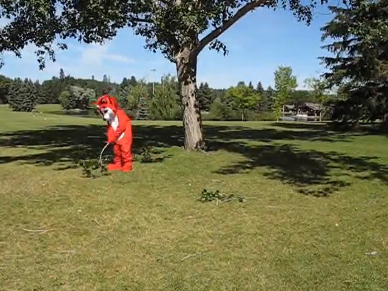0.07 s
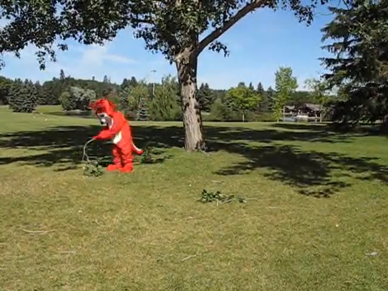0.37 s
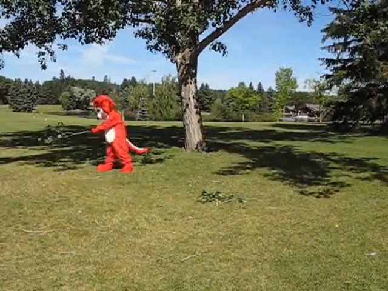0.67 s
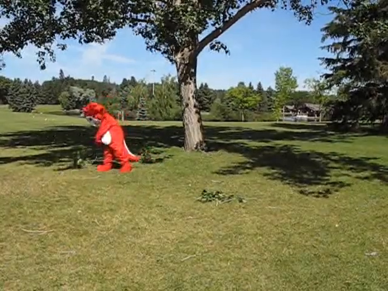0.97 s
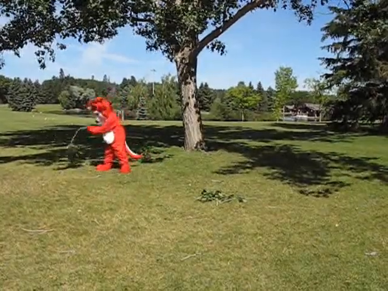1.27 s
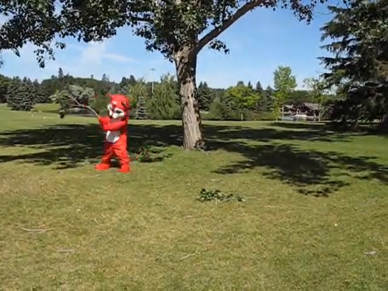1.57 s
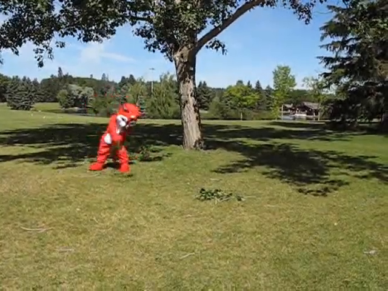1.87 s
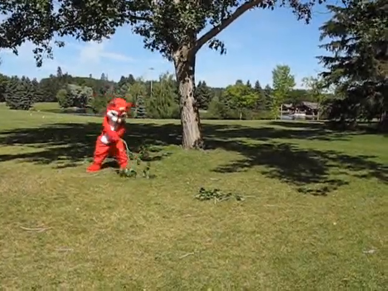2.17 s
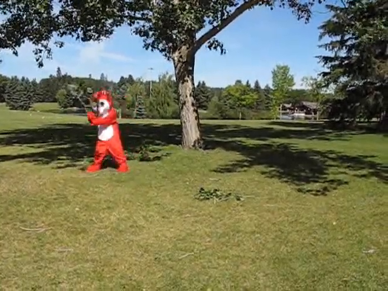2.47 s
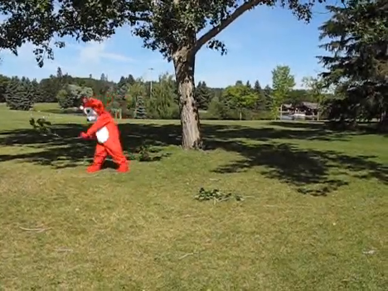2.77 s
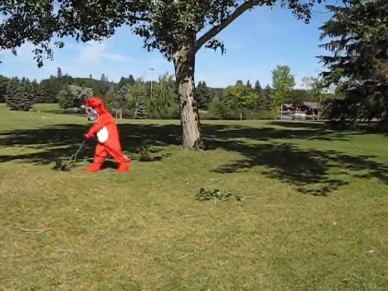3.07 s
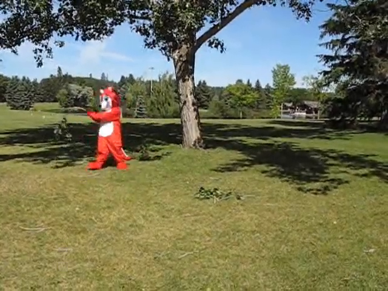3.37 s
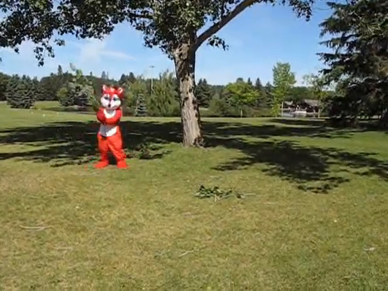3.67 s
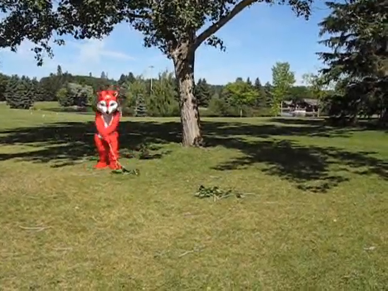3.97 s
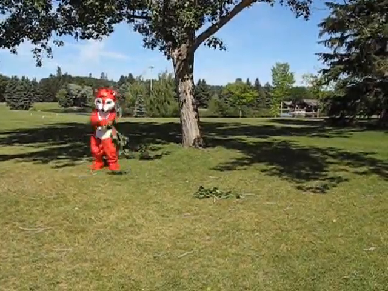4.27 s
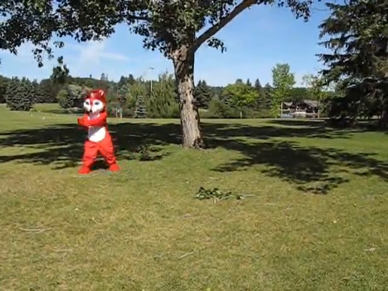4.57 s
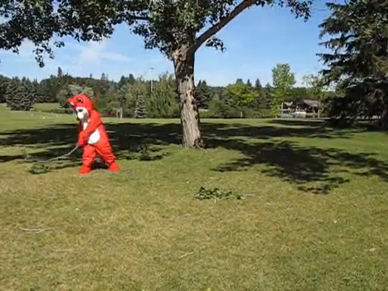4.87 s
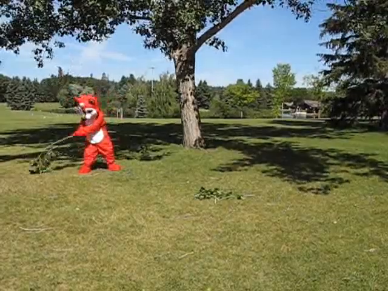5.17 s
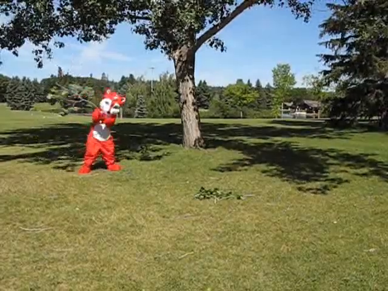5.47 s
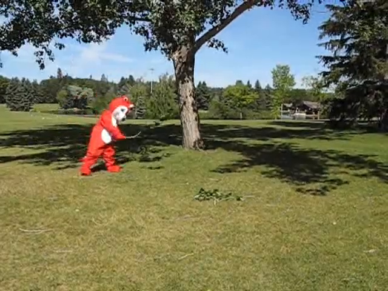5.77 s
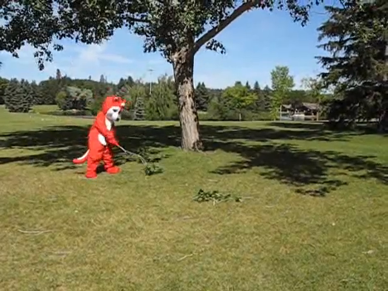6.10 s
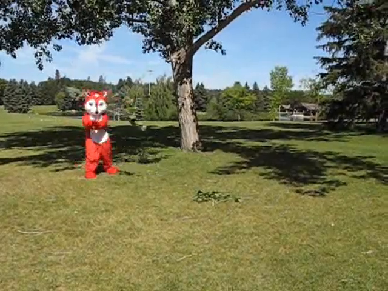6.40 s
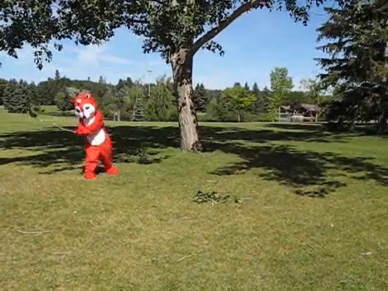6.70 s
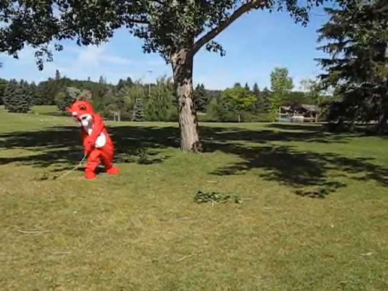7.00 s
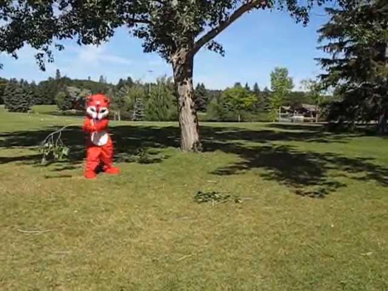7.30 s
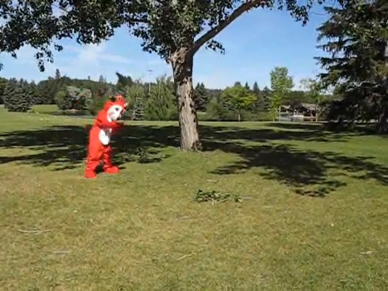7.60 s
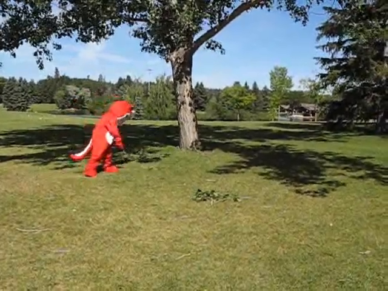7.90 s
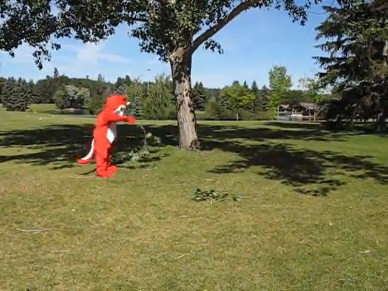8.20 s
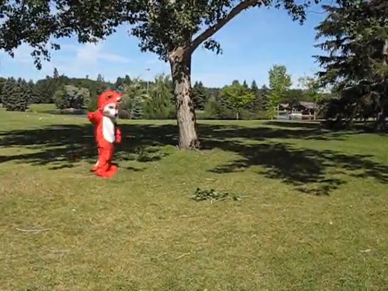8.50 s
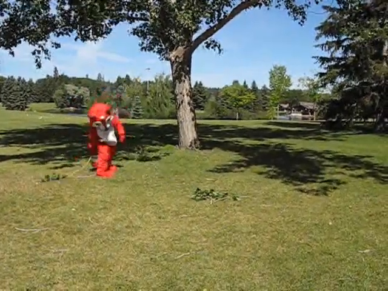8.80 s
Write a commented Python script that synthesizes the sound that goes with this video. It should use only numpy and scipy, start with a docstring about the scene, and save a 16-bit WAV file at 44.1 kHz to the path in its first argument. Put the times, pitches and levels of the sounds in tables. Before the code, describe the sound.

A leafy branch slaps the grass about once a second and rustles, while wind gusts thump on the microphone outdoors.

```python
"""A branch slapped on a lawn

A leafy branch hits the grass about once a second, some metres away. Each slap is a shower of
tiny leaf and twig ticks, and the leaves rustle as the branch is lifted again. Gusts of wind
thump and flap on the microphone, and the park's trees hiss steadily behind."""
import sys
import numpy as np
from scipy import signal
from scipy.fft import rfft, irfft, next_fast_len
from scipy.io import wavfile
from scipy.ndimage import map_coordinates

SR = 44100
rng = np.random.default_rng(int(sys.argv[2]) if len(sys.argv) > 2 else 0)


def generate_wav(sig):
    """Save sig (samples, or channels by samples) to the path in sys.argv[1] as 16-bit PCM at SR."""
    pcm = np.round(np.clip(np.atleast_2d(sig).T, -1, 1) * 32767).astype(np.int16)
    wavfile.write(sys.argv[1], SR, pcm)


N = 390285

# Each stroke of the branch. Twig levels are relative to the leaves; the trailing part lands later.
# start_s, level_db, rise_s, twig_db, trail_delay_s, trail_level_db, trail_twig_db, lift_level_db
STROKES = [(.191, -31.5, .012, -2, 0.027, -32.5, -2, -46), (1.047, -34, 0.034, -6, 0.049, -35.5, 4, -47),
           (2.054, -25.5, .016, 1, 0.021, -27.5, -14, -41), (2.975, -20, 0.018, -7, 0.056, -29.5, -5, -47),
           (4.03, -25, 0.017, -2, 0.049, -36, 4, -44.5), (4.984, -29, 0.0069, -1, 0.029, -28, 9, -48),
           (6.034, -27, 0.015, 2, 0.056, -41, 11.5, -54), (7.027, -23.5, .017, -2, 0.02, -32, -14, -47.5),
           (7.979, -27.5, 0.0096, -1.5, 0.028, -33, -8, -48)]
# The bright tone of leaves and the duller tone of twigs: pitch_hz, relative_db
LEAF_TONE = [(300, -2), (1000, -1), (2500, 4), (4000, 6), (6000, 4.5), (9500, 4.5), (12500, 8.5),
             (14500, 0), (15500, 7)]
TWIG_TONE = [(150, -15), (600, -3), (1300, -7), (2300, 5), (3600, 0.5), (6000, -9), (12000, -14),
             (15500, -28)]

def slaps(leaf_gain_db=1, twig_gain_db=-6, twig_fade_s=0.081):
    """Each landing shakes out leaf and twig ticks, which drop by 60 dB in their fade time."""
    leaf_power, twig_power = np.zeros((2, N + SR))
    t = np.arange(SR // 2) / SR
    for start_s, level_db, rise_s, twig_db in landings():
        leaf_fade_s = 0.15 * 2 ** ((-18 - level_db) / 31)  # softer landings settle more slowly
        attack = np.minimum(t / rise_s, 1) ** 1.5
        since_peak = np.maximum(t - rise_s, 0)
        at = round(start_s * SR) + np.arange(len(t))
        leaf_power[at] += (attack * amp(level_db - 60 * since_peak / leaf_fade_s)) ** 2
        twig_power[at] += (attack * amp(level_db + twig_db - 60 * since_peak / twig_fade_s)) ** 2
    leaves = np.sqrt(leaf_power[:N]) * crackle(LEAF_TONE, per_second=12000, spread_db=6)
    twigs = np.sqrt(twig_power[:N]) * crackle(TWIG_TONE, per_second=3600, spread_db=4)
    return amp(leaf_gain_db) * leaves + amp(twig_gain_db) * twigs

def landings(trail_rise_s=0.0062):
    """The branch lands in two parts: the leading leaves, then the trailing ones."""
    for start_s, level_db, rise_s, twig_db, delay_s, trail_db, trail_twig_db, _ in STROKES:
        yield start_s, level_db, rise_s, twig_db
        yield start_s + delay_s, trail_db, trail_rise_s, trail_twig_db

# Brisk swishes between strokes: peak_s, level_db, half_length_s
SWISHES = [(4.212, -37.5, .022), (6.51, -40, 0.0087), (8.812, -42.5, 0.13)]
# The tone of leaves sliding over grass: pitch_hz, relative_db
BRUSH_TONE = [(500, -5), (1500, -13), (3500, -3.5), (6000, -8.5), (9500, -12), (12500, -6.5), (15500, -20)]

def rustles(lift_after_s=0.27, lift_half_s=0.078):
    """Leaves brush the grass as the branch is lifted, and each other as it swings."""
    lifts = [(start_s + lift_after_s, lift_db, lift_half_s) for start_s, *_, lift_db in STROKES]
    return np.sqrt(swells(lifts + SWISHES)) * crackle(BRUSH_TONE, per_second=11000, spread_db=9.5)

# Single cracks, with the twig's level relative to the leaf's: peak_s, level_db, twig_db
SNAPS = [(3.001, -38, -14), (3.98, -50, 19), (6.098, -32, -8), (8.03, -32, -6)]

def snaps(half_length_s=0.00074):
    """Now and then one leaf or twig cracks on its own."""
    leaf = np.sqrt(swells([(s, db, half_length_s) for s, db, _ in SNAPS]))
    twig = np.sqrt(swells([(s, db + twig_db, half_length_s) for s, db, twig_db in SNAPS]))
    return leaf * noise(LEAF_TONE) + twig * noise(TWIG_TONE)

# How long the echo takes to drop by 60 dB: pitch_hz, fade_s
ECHO_FADES = [(200, 0.27), (2000, 0.21), (12000, 0.24)]

def park_echo(sound):
    """The ground and trees scatter the sound into a short tail."""
    hz, t, bands = signal.stft(rng.standard_normal(SR // 2), SR, nperseg=256)
    fade = amp(-60 * t / at_pitch(ECHO_FADES, hz)[:, None])
    _, tail = signal.istft(bands * fade, SR, nperseg=256)
    return signal.fftconvolve(sound, tail / np.linalg.norm(tail))[:N]

# How hard the wind blows on the microphone: time_s, relative_db
GUSTS = [(0, -25), (.6, -28.5), (1.13, -30.5), (1.42, -25), (1.52, -44.5), (1.78, -39.5), (2.32, -35.5),
         (2.41, -45), (2.78, -36.5), (2.95, -32.5), (3.25, -32), (3.7, -30.5), (4.45, -32.5), (4.92, -32.5),
         (5.1, -47), (5.55, -43), (5.78, -26.5), (6.66, -30), (6.83, -35.5), (7.2, -33), (7.6, -26.5),
         (7.9, -33), (8.5, -33), (8.8, -26)]
# Short blasts, brighter when the cutoff is higher: peak_s, relative_db, half_length_s, cutoff_hz
BLASTS = [(0.065, -19.5, 0.038, 317), (0.168, -12.5, 0.0056, 330), (0.234, -15.5, 0.021, 527),
          (0.386, -18, 0.017, 340), (0.508, -22, 0.038, 287), (0.627, -18, .02, 348),
          (0.8, -24, 0.068, 370), (0.965, -21, 0.014, 268), (1.36, -25, 0.023, 380),
          (1.864, -28, 0.028, 280), (2.028, -21, 0.011, 168), (2.119, -27, 0.013, 200),
          (2.194, -26, 0.023, 348), (2.525, -23.5, 0.0095, 296), (2.935, -23.5, 0.031, 218),
          (3.13, -25.5, 0.017, 350), (3.381, -27, 0.011, 520), (3.652, -16.5, 0.0063, 165),
          (3.787, -23, 0.012, 160), (3.923, -25.5, 0.026, 240), (4.125, -20.5, 0.0058, 142),
          (4.357, -24, 0.023, 307), (4.429, -24, 0.013, 190), (4.732, -26, 0.026, 390),
          (4.847, -27.5, 0.011, 420), (5.205, -38, 0.036, 243), (5.379, -26.5, 0.027, 170),
          (5.673, -22, 0.018, 192), (5.785, -17.5, 0.017, 270), (5.99, -21.5, 0.046, 260),
          (6.331, -18.5, 0.012, 290), (6.609, -23.5, 0.028, 247), (7.037, -28, 0.066, 280),
          (7.282, -19.5, 0.013, 400), (7.389, -16, 0.017, 270), (7.547, -14, 0.015, 460),
          (7.674, -22.5, 0.016, 288), (7.792, -15.5, 0.011, 610), (8.038, -17, 0.026, 635),
          (8.136, -20.5, 0.026, 524), (8.203, -17.5, .014, 497), (8.261, -23, 0.022, 450),
          (8.334, -13.5, 0.005, 550), (8.417, -21.5, 0.0097, 460), (8.64, -20, 0.037, 574),
          (8.696, -21, .025, 420)]
# The loudest flaps of air, each given its own moment; same shape as the small ones: peak_s, relative_db
LOUD_FLAPS = [(.026, -9.5), (.064, -15), (.167, -5), (.241, -2.5), (.445, -16), (.487, -14), (.649, -14),
              (.82, -10), (.916, -12.5), (1.307, -9), (2.53, -11.5), (3.609, -15.5), (3.857, -18),
              (3.963, -17), (4.413, -11.5), (4.92, -15), (5.859, -10), (5.954, -10.5), (6.037, -15),
              (6.365, -9.5), (6.57, -13), (7.014, -15.5), (7.305, -15), (7.775, -0.5), (7.794, -8),
              (7.802, -8), (8.317, -10), (8.409, -9.5), (8.662, -6.5)]

def wind(gust_gain_db=-3, calm_db=-55, blast_gain_db=-3, flap_gain_db=-2):
    """Wind hits the microphone in fluttering lumps; harder lumps have finer swirls and sound brighter."""
    level_db = level_curve(GUSTS)
    lump_db = 2 * wobble(per_second=45)
    flutter_db = 3 * wobble(per_second=150)
    lumps = amp(np.minimum(lump_db + flutter_db, 6.5))
    gust_power = (amp(level_db + gust_gain_db) ** 2 + amp(calm_db) ** 2) * lumps ** 2
    gust_cutoff_hz = 178 * 2 ** ((level_db + 31.5) / 19) * lumps ** 0.69  # doubles every 19 dB
    flutter = amp(np.minimum(flutter_db, 4))
    blast_scale = (amp(blast_gain_db) * flutter) ** 2
    power = gust_power + blast_scale * swells([(s, db, half) for s, db, half, _ in BLASTS])
    # The cutoff leans towards whichever is stronger, the gust or a blast.
    weighted_cutoffs = sum(hz * swells([(s, db, half)]) for s, db, half, hz in BLASTS)
    blast_pull = blast_scale * flutter ** 0.53 * weighted_cutoffs
    cutoff_hz = (gust_power * gust_cutoff_hz + blast_pull) / power
    flow = np.sqrt(power) * swirls(np.clip(cutoff_hz, 90, 800))
    loud_flaps = amp(flap_gain_db) * flaps(LOUD_FLAPS)
    return diaphragm(flow + loud_flaps + small_flaps(gust_power))

# How the microphone's opening responds to swirling air: pitch_hz, relative_db
SWIRL_TONE = [(15, -26), (40, -11), (90, -2.5), (180, -3.5), (260, -0.5), (400, 0), (650, -0.5),
              (1200, 0.5), (1800, -1.5), (3000, -21), (5000, -35)]

def swirls(cutoff_hz, bass_ratio=0.41):
    """Swirling air makes a rumble that dies away above a moving cutoff."""
    size = next_fast_len(N)
    log_pitch = np.log(np.fft.rfftfreq(size, 1 / SR) + 1)
    spectrum = rfft(noise(SWIRL_TONE), size)
    centres_hz = np.geomspace(35, 3500, 12)
    flow, power = np.zeros((2, N))
    for hz, share in zip(centres_hz, np.eye(len(centres_hz))):
        band = irfft(spectrum * np.interp(log_pitch, np.log(centres_hz), share), size)[:N]
        gain = np.exp(-hz / cutoff_hz) * hz / np.hypot(hz, bass_ratio * cutoff_hz)
        flow += gain * band
        power += gain ** 2 * np.var(band)
    return unit(flow / np.sqrt(power))

def flaps(rows, pitch_hz=590, pitch_spread=0.2, rise_cycles=0.66):
    """Each swirl that breaks on the microphone kicks it back and forth once or twice."""
    peak_s, level_db = np.transpose(rows)[:, :, None]
    hz = pitch_hz * np.exp(pitch_spread * rng.standard_normal(peak_s.shape))
    t = np.arange(SR // 50) / SR
    rise_s = rise_cycles / hz
    envelope = (t / rise_s * np.exp(1 - t / rise_s)) ** 3
    kicks = amp(level_db) * envelope * np.sin(2 * np.pi * (hz * t + rng.random(peak_s.shape)))
    at = (np.maximum(peak_s - rise_s, 0) * SR).astype(int) + np.arange(len(t))
    return np.bincount(at.ravel(), kicks.ravel(), N)[:N]

def small_flaps(gust_power, per_second=8, above_gust_db=5.5):
    """Small swirls break at random moments, harder when the wind is stronger."""
    at = np.flatnonzero(rng.random(N) < per_second / SR)
    level_db = 10 * np.log10(gust_power[at]) + above_gust_db
    return flaps(np.column_stack([at / SR, level_db]))

def diaphragm(pressure, low_cut_hz=35, ring_hz=180, ring_share=0.86):
    """The microphone's thin skin loses the slowest changes and rings briefly after each push."""
    motion = signal.lfilter(*signal.butter(1, low_cut_hz, "high", fs=SR), pressure)
    ring = signal.lfilter(*signal.iirpeak(ring_hz, Q=1.66, fs=SR), motion)
    return motion + ring_share * ring

# How strongly the trees hiss: time_s, relative_db
TREE_LEVELS = [(0.0, -45), (2.64, -43.5), (3.89, -45), (4.24, -42), (4.66, -43.5), (8.63, -43.5),
               (8.85, -42)]
# The tone of their leaves: pitch_hz, relative_db
TREE_TONE = [(300, -43), (700, -5.5), (1500, -3), (2200, -1.5), (3000, 0), (4200, -3.5), (6500, -9),
             (10000, -12), (15000, -21)]

def trees(gain_db=1.5, sway_db=0.64):
    """Countless leaves flutter in the trees, and their ticks blur into a hiss."""
    level_db = level_curve(TREE_LEVELS) + gain_db + sway_db * wobble(per_second=12)
    return amp(level_db) * crackle(TREE_TONE, per_second=14000, spread_db=3.5)

# The tone of the open air: pitch_hz, relative_db
AIR_TONE = [(30, 24.5), (90, 24), (250, -26), (600, 18.5), (1500, -3), (6000, -8), (9500, 2), (12500, 7.5),
            (14200, 2), (15500, -24)]

def air(level_db=-47):
    """A steady hiss and a far rumble lie under everything."""
    return amp(level_db) * noise(AIR_TONE)

def crackle(tone, per_second, spread_db):
    """A dense stream of tiny ticks of uneven size."""
    struck = rng.random(N) < per_second / SR
    sizes = amp(spread_db * np.clip(rng.standard_normal(N), -2, 2))
    return with_tone(struck * sizes * rng.choice([-1, 1], N), tone)

def noise(tone):
    """Smooth noise with the given tone."""
    return with_tone(rng.standard_normal(N), tone)

def with_tone(sound, tone):
    """Turn each pitch up or down as a tone table says, then scale to an average power of 1."""
    size = next_fast_len(N + 8192)
    gains = amp(at_pitch(tone, np.fft.rfftfreq(size, 1 / SR)))
    return unit(irfft(rfft(sound, size) * gains, size)[:N])

def swells(rows):
    """The power of bell-shaped rises and falls, added together."""
    power, t = np.zeros(N), clock()
    for peak_s, level_db, half_s in rows:
        near = slice(*np.searchsorted(t, [peak_s - 4 * half_s, peak_s + 4 * half_s]))
        power[near] += amp(level_db) ** 2 * np.exp(-((t[near] - peak_s) / half_s) ** 2)
    return power

def wobble(per_second):
    """A smooth curve through so many random points a second."""
    points = rng.standard_normal(int(N * per_second / SR) + 4)
    return unit(map_coordinates(points, [clock() * per_second]))

def level_curve(rows):
    """Join a table's levels with straight lines, giving one for every sample."""
    return np.interp(clock(), *np.transpose(rows))

def at_pitch(rows, hz):
    """Read between a table's pitches, with the octaves evenly spaced."""
    pitches_hz, values = np.transpose(rows)
    return np.interp(np.log(hz + 1), np.log(pitches_hz), values)

def clock():
    """The time of every sample, in seconds."""
    return np.arange(N) / SR

def amp(db):
    """Turn decibels into a multiplier."""
    return 10 ** (np.asarray(db) / 20)

def unit(x):
    """Scale to an average power of 1."""
    return x / np.sqrt(np.mean(x ** 2) + 1e-20)

def scene(echo_db=-12):
    """The branch, its echo, the park and the wind, mixed into one channel."""
    branch = slaps() + rustles() + snaps()
    return (branch + amp(echo_db) * park_echo(branch) + trees() + air() + wind())[None]

def record(dry):
    """The very highest treble is cut away."""
    top_hz = 15450
    size = next_fast_len(N + 8192)
    kept = np.fft.rfftfreq(size, 1 / SR) < top_hz
    return irfft(rfft(dry, size) * kept, size)[:, :N]

dry = scene()
out = record(dry)
generate_wav(out)
```